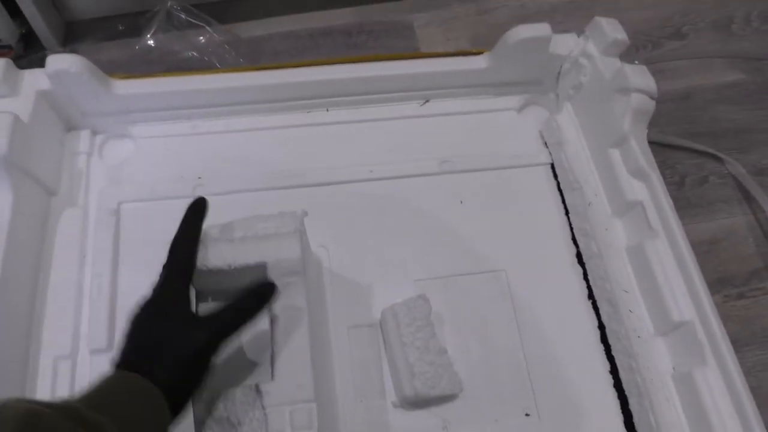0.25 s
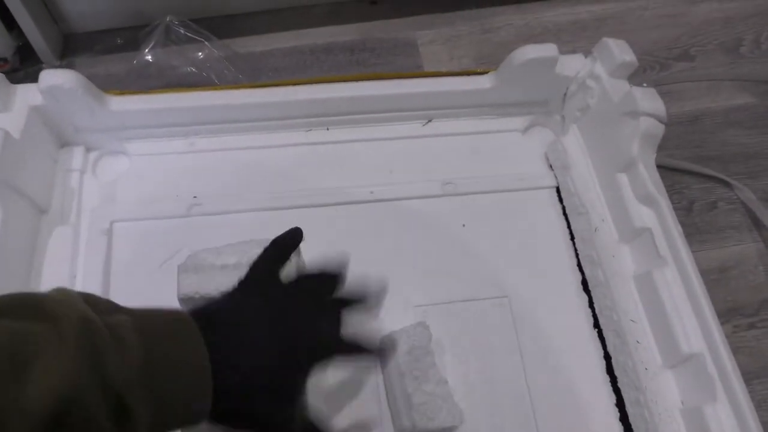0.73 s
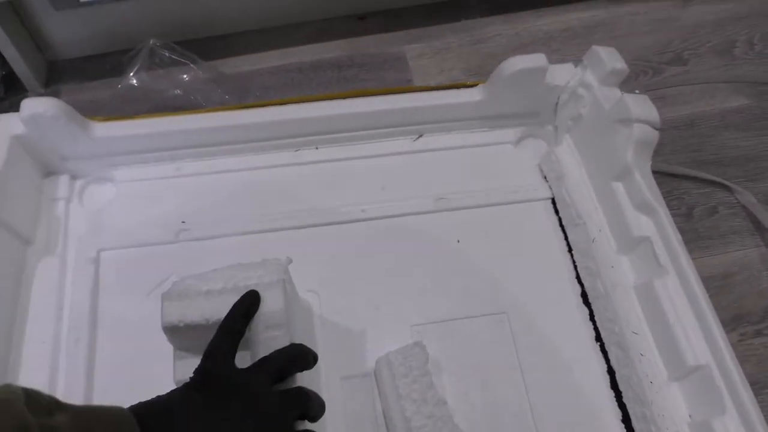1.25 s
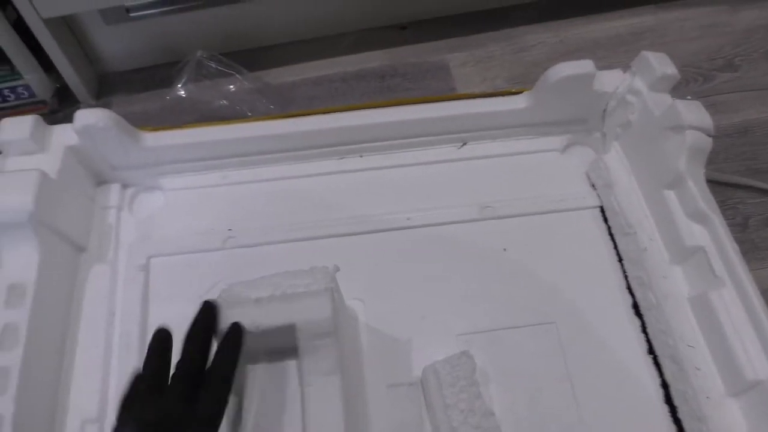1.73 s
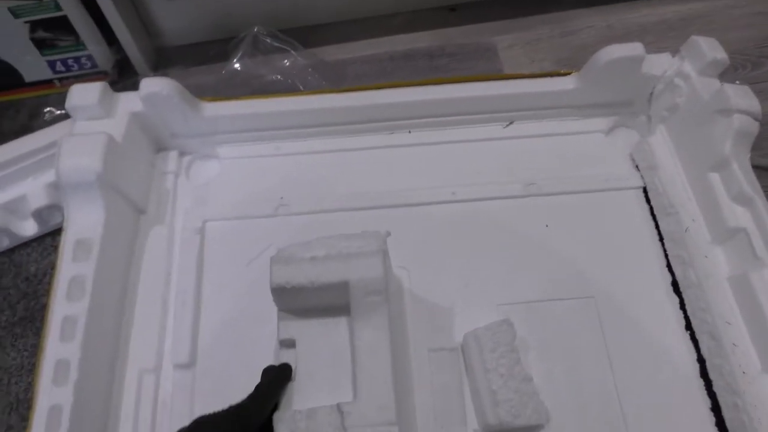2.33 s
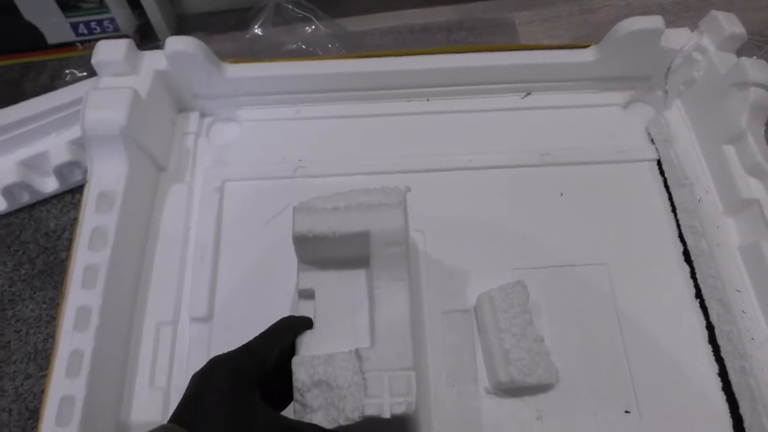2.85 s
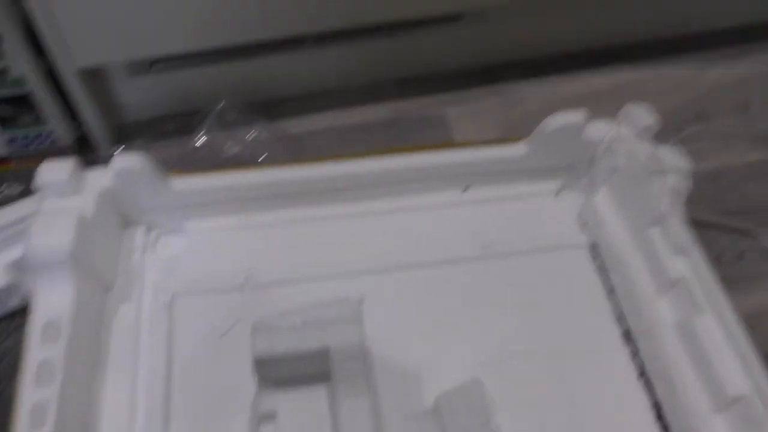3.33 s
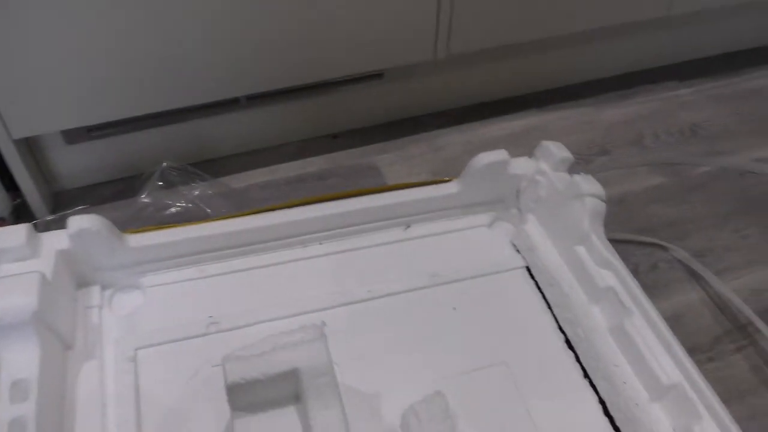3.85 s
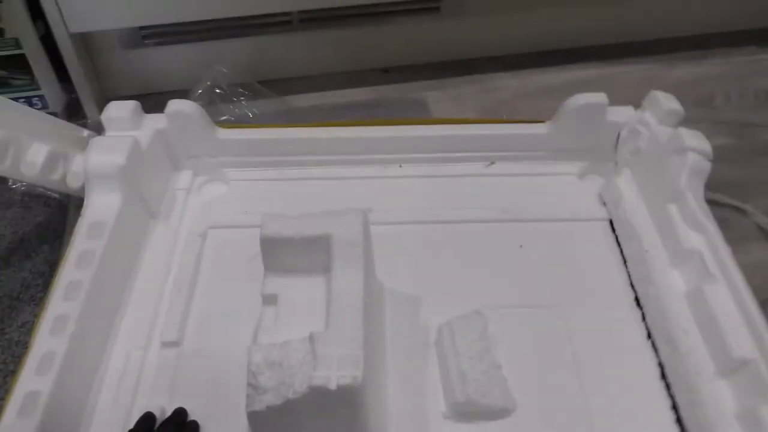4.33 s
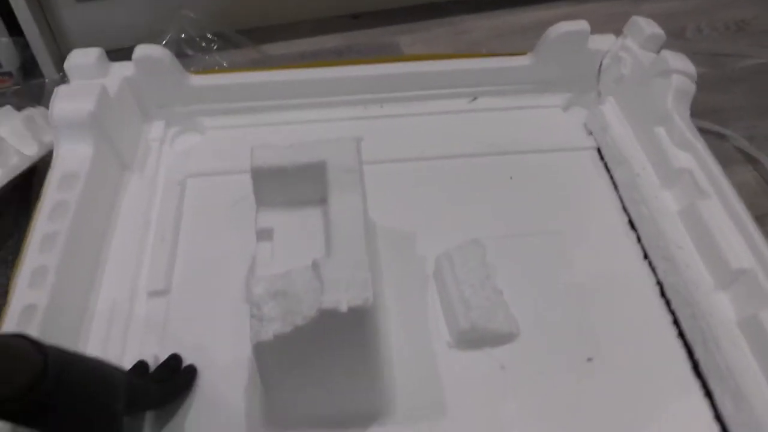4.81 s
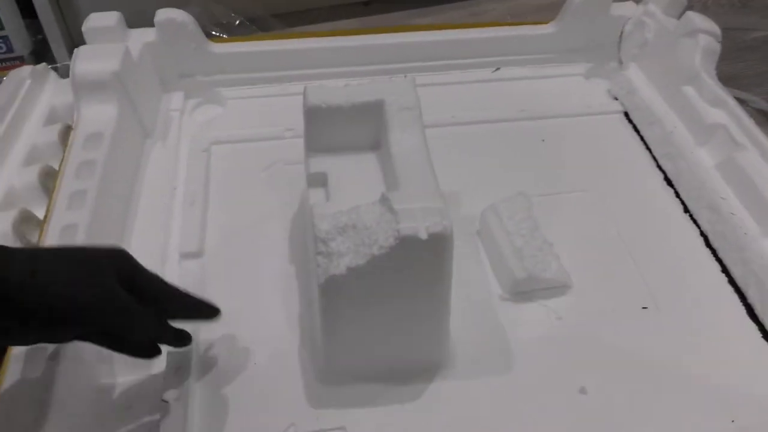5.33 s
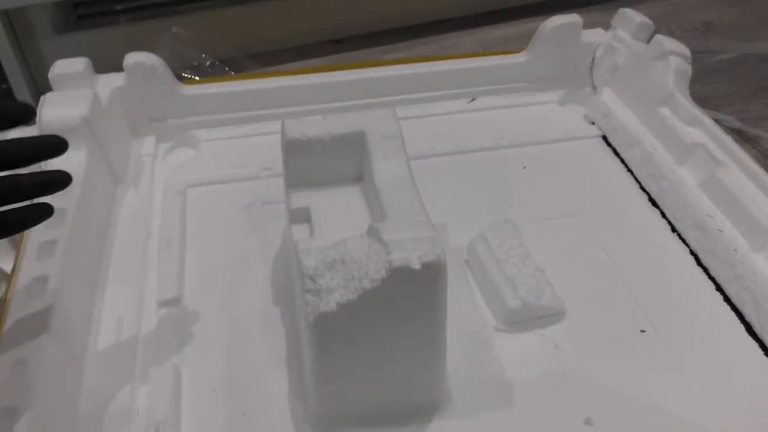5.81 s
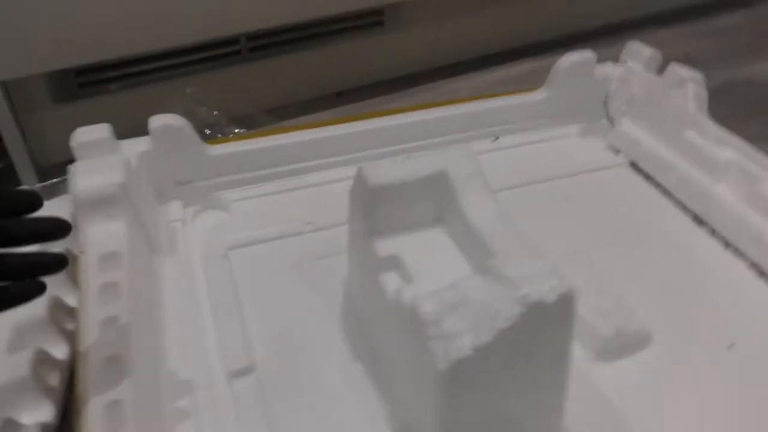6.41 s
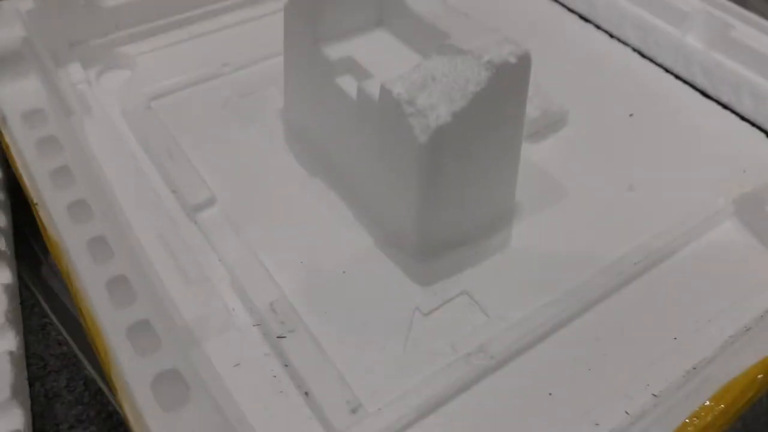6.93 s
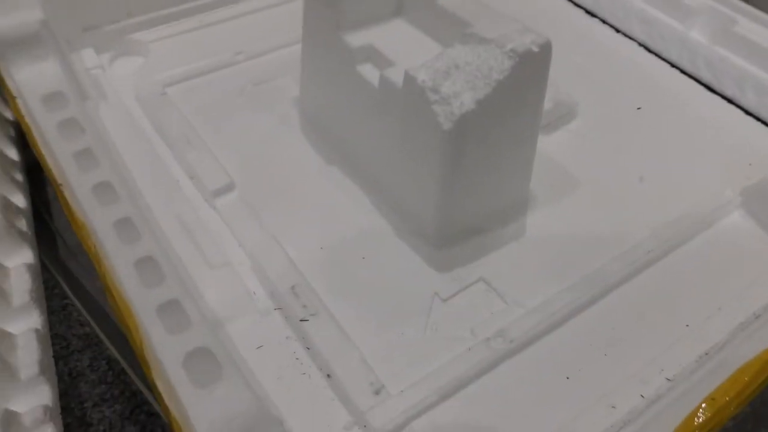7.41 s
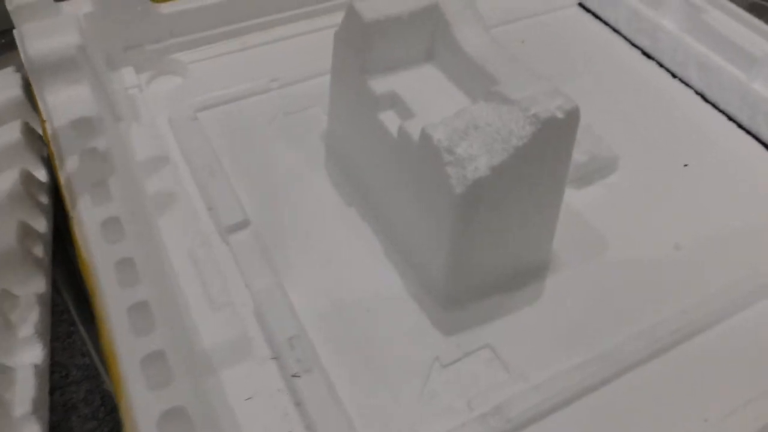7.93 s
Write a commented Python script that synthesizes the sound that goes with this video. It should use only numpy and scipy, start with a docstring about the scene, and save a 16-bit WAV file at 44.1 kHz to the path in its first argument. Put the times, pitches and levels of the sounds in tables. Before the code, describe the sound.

Close in a small room with low steady air rumble, a glove pats a hollow polystyrene tray with soft crunchy thumps. Brief piercing squeaks and dry rubs follow, then a pause with light taps. A rough, gritty drag crackles and snaps, two hard hollow knocks land as the block is set down, and the sound thins to faint rubbing and small clicks.

```python
"""Polystyrene foam rubbed on a hollow tray

A gloved hand pats, rubs, drags and knocks a broken foam block on a large foam packing tray in a small room.
Random bead slips make the rubbing, bursts of noise make the snaps and the crunch of pats and knocks,
and uneven stick-slip waves make the squeaks and groans. Low resonances make the hollow tray boom.
Noise tails add the room, over a steady low rumble of air."""
import sys
import numpy as np
from scipy import signal
from scipy.fft import rfft, irfft, next_fast_len
from scipy.io import wavfile
from scipy.ndimage import uniform_filter1d

SR = 44100
rng = np.random.default_rng(int(sys.argv[2]) if len(sys.argv) > 2 else 0)


def output_pcm(signal):
    """Save a mono or channel-first signal as 16-bit PCM at the path in sys.argv[1].

    Samples are clipped to [-1, 1] before scaling.
    """
    pcm = np.clip(np.atleast_2d(signal).T, -1, 1) * 32767
    wavfile.write(sys.argv[1], SR, np.round(pcm).astype(np.int16))


N = 359856   # length in samples

# Levels in the tables are relative: the functions add shared trims and shapes.
# spectrum of the air rumble: [pitch_hz, level_db]
AIR_SPECTRUM = [(20, -42), (40, -14), (62, -6), (82, 7), (102, -5), (122, 4), (160, -15.5), (290, -3),
                (410, -7.5), (650, -24.5), (1250, -18), (2400, -22), (5000, -32), (16000, -34.5)]
AIR_DB = -49.5
# spectra of the rough scrape and of the fine bead hiss: [pitch_hz, level_db]
RASP_SPECTRUM = [(300, -9), (600, 0), (830, -4), (1100, 4.5), (1600, 1.5), (2400, 1), (3200, -3),
                 (4500, -12.5), (7000, -28.5), (12000, -49)]
HISS_SPECTRUM = [(1500, -41), (3500, 0), (5000, -1), (7500, 0), (10500, 0.5), (13000, -3.5), (16000, -12)]
# resonances of the hollow tray, then of the small block: [pitch_hz, width_hz, level_db]
TRAY_MODES = [(130.4, 22, -13), (198.4, 68, -6.5), (268, 66, 0.5), (325, 72, 3), (376.3, 95, 1.5),
              (460, 60, -2.5)]
BLOCK_MODES = [(1120, 250, -14.5), (2285, 500, -3.5), (2744, 41, -7), (3160, 170, -18), (3730, 300, -1.5),
               (4980, 180, -5), (6700, 240, -12.5), (10060, 880, 3)]

# short rubs of glove or foam on foam: [start_s, rise_s, hold_s, boom_db, rasp_db, hiss_db]
STROKES = [(0, 0.13, .1, -70, -52.5, -58), (0.748, .04, 0.13, -54, -46.5, -61),
           (1.215, 0.033, 0.12, -46, -44.5, -53), (1.48, 0.035, 0.036, -48, -44, -40.5),
           (1.563, 0.037, .2, -37, -40.5, -52.5), (1.664, 0.032, .01, -36, -34, -49.5),
           (1.794, 0.035, 0.1, -42, -52, -53), (1.918, 0.0075, 0.046, -49, -32, -43),
           (1.945, .02, 0.11, -41.5, -35, -32), (2.062, 0.046, .12, -41.5, -40, -34.5),
           (2.213, 0.026, 0.061, -63, -42, -31.5), (2.492, 0.057, 0.56, -48, -54.5, -63.5),
           (2.757, 0.031, 0.026, -35.5, -46.5, -51.5), (3.24, 0.07, .2, -58, -57.5, -77),
           (3.498, 0.039, 0.026, -38, -37, -30), (3.59, .02, .07, -56, -51, -51),
           (3.731, 0.024, 0.018, -41, -42.5, -43.5), (3.848, 0.013, 0.076, -51, -46.5, -38.5),
           (3.985, .04, 0.055, -43.5, -40.5, -47.5), (4.101, 0.013, 0.023, -51, -41.5, -31),
           (4.67, 0.03, 0.012, -35, -26, -41), (5.373, 0.042, .045, -39.5, -41.5, -31.5),
           (5.685, 0.032, .07, -47, -36, -38.5), (6.261, 0.019, 0.0091, -40.5, -47, -60),
           (6.422, 0.033, 0.05, -50.5, -47, -57.5), (6.797, 0.031, 0.035, -44, -46.5, -54),
           (7.278, 0.026, 0.045, -62, -58, -51), (8.105, 0.038, .02, -63, -51, -53)]
STROKE_SAG_DB_PER_S, STROKE_RELEASE_DB_PER_S = 11.5, 274   # a rub eases while it lasts, then dies away
# effort of the long drag, then of the light rubbing as the foam settles: [time_s, effort_db]
DRAG_EFFORT = [(4.17, -35), (4.254, -32), (4.61, -34.5), (4.698, -28.5), (4.916, -45), (4.994, -41.5),
               (5.142, -43), (5.224, -41), (5.35, -41.5)]
SETTLING_EFFORT = [(5.85, -43.5), (6.11, -47), (6.26, -51.5), (6.56, -51.5), (6.69, -47), (7.32, -50.5),
                   (7.88, -62), (8.1, -70)]
DRAG_FADE_S, FULL_EFFORT_DB = 0.014, -32.5
# boom, rasp and hiss rows of the drag: [full_effort_level_db, gain_db_per_effort_db]
DRAG_VOICES = [(-35, 1.07), (-33.5, 0.96), (-33.5, 1.44)]
DRAG_UNEVEN_DB, DRAG_UNEVEN_PER_S = 1.5, 16
CRACKLES_PER_S, CRACKLE_DB, CRACKLE_SPREAD_DB = 220, -8, 3   # coarse catches among the fine bead slips

# soft pats of the glove with a long crunch: [start_s, thump_db, crunch_db, hiss_db]
PATS = [(.413, -29.5, -32.5, -37.5), (.549, -34, -35, -40), (.744, -41, -43.5, -49),
        (.769, -24.5, -34.5, -44.5), (1.049, -31, -38, -42), (1.193, -32, -38.5, -41.5),
        (1.741, -47, -38, -36.5), (2.792, -39, -33.5, -38.5), (3.139, -29, -34, -42)]
PAT_ATTACK_S, PAT_T60_S = 0.0016, 0.2   # T60: time to fall by 60 dB
# hard knocks of foam on foam with a short crunch: [start_s, thump_db, crunch_db, hiss_db]
KNOCKS = [(1.262, -52, -39, -30.5), (1.278, -17, -31, -55), (1.307, -37, -50, -60), (1.801, -31, -36, -57),
          (2.138, -32.5, -43, -33), (2.583, -34, -40, -41), (2.646, -33, -36.5, -39),
          (3.725, -32, -34, -60), (3.953, -32.5, -27, -40), (4.181, -21.5, -24, -37),
          (4.754, -26, -41, -46), (4.996, -34.5, -39, -43), (5.048, -34, -43, -57),
          (5.378, -16, -18.5, -30), (5.576, -16.5, -30, -31), (5.586, -27, -26, -51),
          (5.627, -26, -45, -47), (5.743, -32, -41, -48), (5.827, -28.5, -43, -46), (5.899, -36, -55, -62),
          (5.991, -50, -30.5, -32), (6.262, -55, -39, -59), (6.342, -37, -59, -67),
          (6.646, -38, -38.5, -41.5), (7.223, -34.5, -58, -67), (7.333, -52, -37, -62),
          (7.529, -37.5, -57, -68), (7.594, -41, -47, -61)]
KNOCK_ATTACK_S, KNOCK_T60_S = 0.0011, 0.036
# the whole tray rocking against the floor: [start_s, level_db]
BUMPS = [(.772, -16), (1.300, -34), (5.38, -22), (5.58, -36), (5.743, -20)]

# squeaks of the block: [start_s, length_s, first_slip_rate_hz, last_slip_rate_hz, level_db, roughness_0_to_1]
SQUEAKS = [(0.845, 0.021, 1190, 1460, -38, .16), (0.854, 0.045, 1950, 2900, -32, 0.25),
           (.883, 0.029, 1262, 1486, -25, 0.31), (0.893, 0.041, 2290, 3910, -21.5, 0.24),
           (0.911, 0.018, 5740, 7130, -23, 0.17), (1.369, 0.021, 1393, 1880, -29.5, 0.27),
           (1.383, 0.025, 1972, 2424, -22, 0.15), (1.393, 0.042, 2407, 2722, -14, 0.18),
           (1.421, 0.015, 4990, 4700, -15.5, 0.08), (1.434, 0.078, 3230, 3300, -29, 0.07),
           (1.477, 0.025, 3092, 2567, -18, 0.12), (1.675, .036, 899, 1113, -28.5, .17),
           (1.923, 0.05, 1735, 2074, -28.5, 0.25), (1.951, 0.043, 2144, 2060, -28, .08),
           (1.986, .1, 2100, 2277, -29, .19), (2.105, 0.12, 1500, 1710, -33.5, 0.17),
           (2.224, 0.02, 2617, 2486, -21.5, 0.1), (2.228, 0.024, 7300, 7270, -19, 0.08),
           (2.239, 0.018, 2396, 2270, -22, .2), (2.25, 0.021, 7450, 7850, -23, 0.04),
           (2.274, 0.013, 10200, 11840, -18, .11), (2.3, 0.024, 8430, 8660, -21.5, 0.17),
           (3.517, .073, 11440, 12550, -32, 0.25), (3.752, 0.032, 1124, 1294, -37, .11),
           (4.056, 0.012, 1920, 1760, -32.5, 0.17), (4.108, 0.043, 4280, 4660, -32.5, 0.26),
           (4.43, 0.024, 1400, 1750, -42, .13)]
# a tightening squeak swells to a peak, a slackening one is loudest almost at once
RISING_PEAK_SHARE, SLACKENING_ATTACK_S = 0.49, 0.0048
SQUEAK_SLOPE_DB = -6   # overtone slope per octave
SQUEAK_GRIT_DB = -9   # torn beads against the squeak at 10 kHz; quieter at slower slips
# the loudest beads snapping: [start_s, crack_db, hiss_db]
SNAPS = [(.845, -30, -49), (2.246, -40, -13), (2.307, -45, -24), (2.487, -44, -50), (2.892, -52, -43),
         (2.9511, -47, -45), (3.04, -48, -60), (3.627, -39, -34), (3.709, -32.5, -40), (3.7634, -55, -27.5),
         (3.9571, -28, -22.5), (4.0591, -30.5, -40), (4.1294, -29.5, -25), (4.7156, -21, -16.5),
         (4.944, -41, -25.5), (5.0013, -28, -29.5), (5.2183, -31.5, -36), (5.318, -42, -33),
         (5.6283, -35.5, -28), (5.6592, -46, -24.5), (5.7042, -34, -31), (6.0787, -35.5, -57),
         (6.1285, -34, -27.5), (6.291, -30.5, -53), (6.8255, -37, -53), (6.9502, -37, -46),
         (7.5167, -38, -68), (7.6539, -40, -63), (7.755, -42, -56), (7.8035, -42.5, -54), (7.913, -43, -45),
         (7.9526, -44, -64)]
# fainter random snaps and taps while the foam is dragged and settles; levels are for full effort
STRAY_SNAPS_PER_S, STRAY_CRACK_DB, STRAY_HISS_DB = 11, -33, -38.5
STRAY_TAPS_PER_S, STRAY_THUMP_DB, STRAY_CRUNCH_DB, STRAY_TAP_HISS_DB = 6, -38, -46, -56
STRAY_FOLLOWS, STRAY_HISS_FOLLOWS = .5, .85   # dB per dB of effort
STRAY_SPREAD_DB = 2.5
# slow groans of the tray: [start_s, length_s, slip_rate_hz, level_db, overtone_slope_db_per_octave]
GROANS = [(1.574, .04, 358, -34, -19), (1.681, 0.066, 381.7, -29, -25), (1.794, .11, 374, -36, -8),
          (1.943, 0.016, 394, -20.5, -32), (2.726, 0.043, 379, -30, -20), (2.766, .028, 357, -30, -30),
          (2.798, 0.023, 353, -27.5, -27), (3.525, 0.034, 373, -33, -30), (3.72, 0.059, 305.2, -31.5, -2.5),
          (5.578, .07, 341.8, -26, -9.5), (5.58, 0.04, 1029, -24.5, -19), (5.652, 0.05, 462, -30.5, -7)]
# the slip rate starts the glide share low and ends that share high
GROAN_GLIDE, GROAN_ROUGH, GROAN_PEAK_SHARE = 0.028, 0.133, 0.37

# how long the room rings: [pitch_hz, t60_s]
ROOM_T60 = [(100, 0.71), (400, 0.33), (1000, 0.36), (3000, 0.48), (8000, 0.41), (16000, 0.15)]
# how strongly the room answers: [pitch_hz, level_db]
ROOM_LEVEL = [(100, -7.5), (400, -7.5), (1000, -6.5), (3000, -6.5), (8000, -4), (16000, -3.5)]
# strength of the left-right difference: [pitch_hz, side_against_mid_db]
STEREO_WIDTH = [(30, -41), (120, -10.5), (300, -17.5), (600, -7), (1500, -6), (3500, -5.5), (5200, -4.5),
                (6200, -28), (8000, -17), (14000, -3)]
CUTOFF_HZ = 16100


def from_db(db):
    """Turn decibels into gain."""
    return 10 ** (np.asarray(db) / 20)


def rms_one(x):
    """Scale a sound to an average strength (rms) of 1."""
    return x / np.sqrt(np.mean(x ** 2) + 1e-20)


def at_hz(points, hz):
    """Read a table between its points, on a log-frequency axis."""
    known, values = np.transpose(points)
    return np.interp(np.log(np.maximum(hz, 1)), np.log(known), values)


def colour(x, spectrum):
    """Filter a sound by a table of level against pitch."""
    size = next_fast_len(len(x))
    hz = np.arange(size // 2 + 1) * SR / size
    return irfft(rfft(x, size) * from_db(at_hz(spectrum, hz)), size)[:len(x)]


def drift(rate):
    """Wander smoothly at random with spread 1, through this many points a second."""
    points = rng.standard_normal(int(N / SR * rate) + 2)
    return rms_one(np.interp(np.arange(N) * rate / SR, np.arange(len(points)), points))


def add(track, s, sound):
    """Mix a sound into a track at time s."""
    start = max(0, round(s * SR))
    track[start:start + len(sound)] += sound[:max(0, N - start)]


def air_rumble():
    """A steady low rumble of air is noise with most of its strength in the bass."""
    return from_db(AIR_DB) * rms_one(colour(rng.standard_normal(N), AIR_SPECTRUM))


def resonate(force, modes):
    """A foam body answers a force with a few broad resonances."""
    out = 0
    for k, (hz, width_hz, db) in enumerate(modes):
        r = np.exp(-np.pi * width_hz / SR)   # a wider mode dies sooner
        feed = np.array([1, 0, -1]) * (1 - r * r) / 2
        feedback = [1, -2 * r * np.cos(2 * np.pi * hz / SR), r * r]
        sign = (-1) ** k   # neighbouring modes push opposite ways
        out = out + sign * from_db(db) * signal.lfilter(feed, feedback, force + 1e-18)
    return out


def dull(x, top_hz=560):
    """The wide soft panel cannot follow fast forces."""
    return signal.sosfilt(signal.butter(4, top_hz, fs=SR, output="sos"), x)


def tray(force):
    """The hollow tray booms in its low modes."""
    return dull(resonate(force, TRAY_MODES))


def effort_db(t):
    """How hard the foam is dragged at times t."""
    return np.interp(t, *np.transpose(DRAG_EFFORT + SETTLING_EFFORT))


def rub_gains():
    """The drag drives boom, rasp and hiss together, and each stroke rises, holds and dies away."""
    t = np.arange(N) / SR
    effort = effort_db(t) - FULL_EFFORT_DB + DRAG_UNEVEN_DB * drift(DRAG_UNEVEN_PER_S)
    moving = np.clip(1 + (t - DRAG_EFFORT[0][0]) / DRAG_FADE_S, 0, 1)
    power = np.array([(moving * from_db(db + follows * effort)) ** 2 for db, follows in DRAG_VOICES])
    age = np.arange(SR) / SR
    for s, rise, hold, *levels in STROKES:
        sag_db = STROKE_SAG_DB_PER_S * np.maximum(age - rise, 0)
        release_db = STROKE_RELEASE_DB_PER_S * np.maximum(age - rise - hold, 0)
        shape = np.minimum(age / rise, 1) * from_db(-(sag_db + release_db))
        for voice, db in zip(power, levels):
            add(voice, s, (from_db(db) * shape) ** 2)
    return np.sqrt(power)


def grains(per_s, spread_db):
    """Beads catch and let go at random, a few much harder than the rest."""
    sizes = from_db(spread_db * np.minimum(rng.exponential(1, N), 5))
    happens = rng.random(N) < per_s / SR
    return rms_one(happens * sizes * rng.standard_normal(N))


def wander(x, patchy_db=2.5, rate=35, count=9):
    """As the contact moves over the foam, each band up to 13 kHz swells and fades on its own."""
    out = 0
    for hz in np.geomspace(900, 13000, count):
        low = signal.sosfiltfilt(signal.butter(4, hz, fs=SR, output="sos"), x)
        out = out + low * from_db(patchy_db * drift(rate))
        x = x - low   # carry what lies above on to the next band
    return out + x


def rubbing(per_s=30000, full_rasp_db=-32, spread_db=2.0, judder_db=1.23, trim_db=-1):
    """One stream of bead slips booms, rasps and hisses; a harder drag frees more beads each second."""
    boom, rasp, hiss = rub_gains()
    rate = np.clip(per_s * np.sqrt((rasp + hiss) / from_db(full_rasp_db)), 1500, SR)
    # dividing by the root of the rate keeps busy moments from also growing louder here
    fine = grains(rate, spread_db) / np.sqrt(rate) * from_db(judder_db * drift(170))
    coarse = grains(CRACKLES_PER_S, CRACKLE_SPREAD_DB)
    slips = rms_one(fine) + from_db(CRACKLE_DB) * coarse
    booming = boom * rms_one(tray(slips))
    rasping = rasp * rms_one(wander(colour(slips, RASP_SPECTRUM)))
    hissing = hiss * rms_one(wander(colour(slips, HISS_SPECTRUM)))
    return from_db(trim_db) * (booming + rasping + hissing)


def strays(per_s):
    """Pick random moments of the drag and settling: (start_s, effort_against_full_db, chance_db)."""
    start, end = DRAG_EFFORT[0][0], SETTLING_EFFORT[-1][0]
    wait, chance = rng.random(80), rng.uniform(-1, 1, 80)
    times = start + np.cumsum(2 * wait) / per_s
    return [(s, effort_db(s) - FULL_EFFORT_DB, STRAY_SPREAD_DB * c) for s, c in zip(times, chance) if s < end]


def touches(push_hz=245, push_lag_s=0.00264, push_db=5, ring_db=-2, ring_t60=0.037, crush_db=0.37):
    """A contact pushes air off the tray, sets it ringing and crushes a burst of beads."""
    out, t = np.zeros(N), np.arange(SR // 4) / SR
    crush, shake = rng.standard_normal((2, N))
    rasp, hiss = rms_one(colour(crush, RASP_SPECTRUM)), rms_one(colour(crush, HISS_SPECTRUM))
    flex = (np.pi * push_hz * (t - push_lag_s)) ** 2
    push = dull((1 - 2 * flex) * np.exp(-flex), top_hz=437)   # the panel gives way and springs back
    tap_db = np.array([STRAY_THUMP_DB, STRAY_CRUNCH_DB, STRAY_TAP_HISS_DB])
    taps = [(s, *(tap_db + STRAY_FOLLOWS * effort + chance)) for s, effort, chance in strays(STRAY_TAPS_PER_S)]
    soft = (PATS, PAT_ATTACK_S, PAT_T60_S)
    hard = (KNOCKS + taps, KNOCK_ATTACK_S, KNOCK_T60_S)
    for contacts, attack_s, t60 in (soft, hard):
        burst = (1 - np.exp(-t / attack_s)) * from_db(crush_db - 60 * t / t60)
        for s, thump_db, crunch_db, hiss_db in contacts:
            part = (int(s * SR) + np.arange(len(t))) % N   # each contact takes its own stretch of noise
            ring = dull(tray(shake[part] * from_db(-60 * t / ring_t60)), top_hz=430)
            thump = from_db(push_db) * push + from_db(ring_db) * ring / np.abs(ring).max()
            crunch = from_db(crunch_db) * rasp[part] + from_db(hiss_db) * hiss[part]
            add(out, s, from_db(thump_db) * thump + burst * crunch)
    return out


def bumps(hz=105, t60=0.05, attack_s=0.026):
    """The loaded tray bounces on the floor in its lowest mode, a short low tone."""
    out, t = np.zeros(N), np.arange(SR // 4) / SR
    for s, db in BUMPS:
        fade = from_db(db - 60 * t / t60) * (1 - np.exp(-t / attack_s))
        add(out, s, fade * np.sin(2 * np.pi * hz * t))
    return out


def stick_slip(length_s, first_hz, last_hz, rough, slope_db, uneven_db=16, count=7):
    """Every cycle has its own length and strength, and the rate glides with the hand's speed."""
    k = np.arange(1, count + 1)[:, None]   # overtone numbers
    hz = np.geomspace(first_hz, last_hz, int(length_s * SR))
    cycles = np.cumsum(hz) / SR
    late, strong = rng.standard_normal((2, 2048))
    phase = cycles + np.interp(cycles, np.arange(len(late)), np.cumsum(rough * late))
    overtones = from_db(slope_db * np.log2(k)) * (k * hz < CUTOFF_HZ)
    wave = (overtones * np.sin(2 * np.pi * (k * phase + rng.random(k.shape)))).sum(0)
    strength = np.interp(cycles, np.arange(len(strong)), strong)
    return wave * from_db(uneven_db * rough * strength)


def through_block(wave, scatter_t60=0.0079, ring_db=2):
    """Vibration criss-crosses the block for a few milliseconds and rings its modes."""
    t = np.arange(SR // 64) / SR
    paths = rng.standard_normal(len(t)) * from_db(-60 * t / scatter_t60)
    scattered = signal.fftconvolve(wave, paths / np.linalg.norm(paths))[:len(wave)]
    return scattered + from_db(ring_db) * resonate(wave, BLOCK_MODES)


def swelled(wave, slip_hz, peak_share, swell=0.69, lowest_share=0.72):
    """A run of slips swells and fades, with nothing far below its slip rate."""
    wave = signal.sosfilt(signal.butter(8, lowest_share * slip_hz, "high", fs=SR, output="sos"), wave)
    progress = np.linspace(0, 1, len(wave))
    return rms_one(wave) * np.interp(progress, [0, min(peak_share, .95), 1], [0, 1, 0]) ** swell


def squeaks():
    """Fast slips sound through the small block and tear at its beads."""
    out = np.zeros(N)
    for s, length, first_hz, last_hz, db, rough in SQUEAKS:
        wave = rms_one(through_block(stick_slip(length, first_hz, last_hz, rough, SQUEAK_SLOPE_DB)))
        grit = rms_one(colour(rng.standard_normal(SR // 4), HISS_SPECTRUM))[:len(wave)]
        wave = wave + from_db(SQUEAK_GRIT_DB) * np.sqrt(first_hz / 10 ** 4) * grit
        peak_share = RISING_PEAK_SHARE if last_hz > first_hz else SLACKENING_ATTACK_S / length
        add(out, s, from_db(db) * swelled(wave, min(first_hz, last_hz), peak_share))
    return out


def snaps(t60=0.0092, level_db=6, attack_s=0.00059):
    """A bead bursts with a crack of noise a few milliseconds long."""
    out, t = np.zeros(N), np.arange(SR // 32) / SR
    faint = []
    for s, effort, chance in strays(STRAY_SNAPS_PER_S):
        crack_db = STRAY_CRACK_DB + STRAY_FOLLOWS * effort + chance
        hiss_db = STRAY_HISS_DB + STRAY_HISS_FOLLOWS * effort + chance
        faint.append((s, crack_db, hiss_db))
    fade = from_db(level_db - 60 * t / t60) * (1 - np.exp(-t / attack_s))
    for (s, crack_db, hiss_db), burst in zip(SNAPS + faint, rng.standard_normal((128, len(t)))):
        crack = from_db(crack_db) * rms_one(colour(burst, RASP_SPECTRUM))
        hiss = from_db(hiss_db) * rms_one(colour(burst, HISS_SPECTRUM))
        add(out, s, fade * (crack + hiss))
    return out


def groans():
    """Slow slips sound straight off the tray."""
    out = np.zeros(N)
    for s, length, hz, db, slope_db in GROANS:
        wave = stick_slip(length, hz * (1 - GROAN_GLIDE), hz * (1 + GROAN_GLIDE), GROAN_ROUGH, slope_db)
        add(out, s, from_db(db) * swelled(wave, hz, GROAN_PEAK_SHARE))
    return out


def room_response(gap_s=.003):
    """Wall reflections crowd into a noise tail that dies at its own pace in each octave."""
    t, out = np.arange(int(.7 * SR)) / SR, 0
    for hz in 90 * 2. ** np.arange(8):
        octave = signal.butter(2, [hz / np.sqrt(2), hz * np.sqrt(2)], "band", fs=SR, output="sos")
        band = signal.sosfilt(octave, rng.standard_normal(len(t)))
        fade = from_db(-60 * t / at_hz(ROOM_T60, hz)) * (t > gap_s)
        out = out + from_db(at_hz(ROOM_LEVEL, hz)) * band * fade / np.sqrt(np.sum(fade ** 2))
    return out


def scene(side_db=3, left_db=0.2):
    """Place the foam close in front, the room around it, and a low steady rumble of air."""
    foam = rubbing() + touches() + bumps() + snaps() + squeaks() + groans()
    walls, walls_across = [signal.fftconvolve(foam, room_response())[:N] for _ in range(2)]
    air, air_across = air_rumble(), air_rumble()
    mid = foam + walls + air
    side = colour(from_db(side_db) * walls_across + 0.97 * air_across, STEREO_WIDTH)
    return np.array([from_db(left_db) * (mid + side), from_db(-left_db) * (mid - side)])


def limiter(x, threshold_db=-24, squeeze=0.88, release_db_per_s=65, attack_s=0.0088):
    """Loud treble pulls the gain down within milliseconds; it then recovers at a steady pace."""
    treble = signal.sosfilt(signal.butter(2, 1800, "high", fs=SR, output="sos"), x.mean(0))
    level_db = 10 * np.log10(np.maximum(uniform_filter1d(treble ** 2, size=220), 1e-12))
    wanted_cut_db = squeeze * np.maximum(level_db - threshold_db, 0)
    recovery = release_db_per_s * np.arange(N) / SR
    cut_db = np.maximum.accumulate(wanted_cut_db + recovery) - recovery
    r = np.exp(-1 / (attack_s * SR))
    return x * from_db(-signal.lfilter([1 - r], [1, -r], cut_db))


def record(dry):
    """A limiter ducks the sound when its treble is loud, and the top is cut steeply."""
    return signal.sosfilt(signal.ellip(10, .2, 80, CUTOFF_HZ, fs=SR, output="sos"), limiter(dry))


dry = scene()
out = record(dry)
output_pcm(out)
```